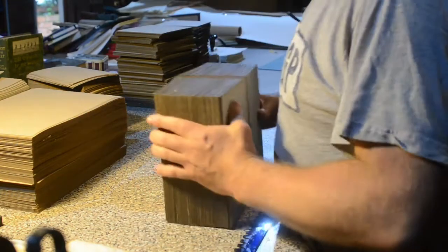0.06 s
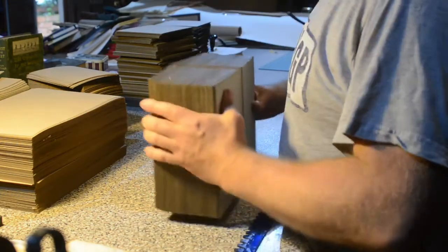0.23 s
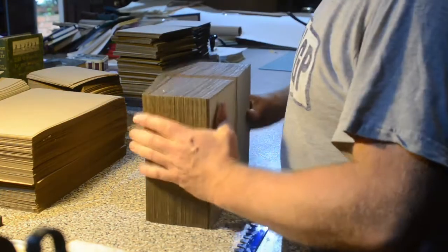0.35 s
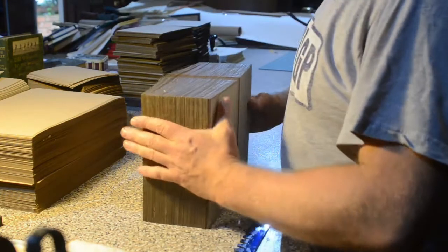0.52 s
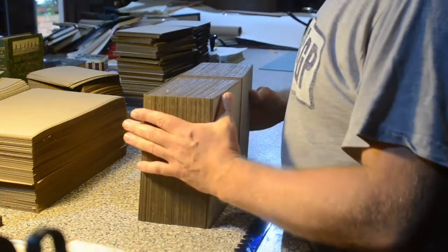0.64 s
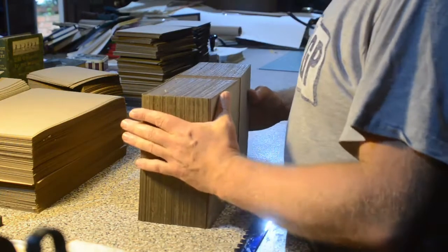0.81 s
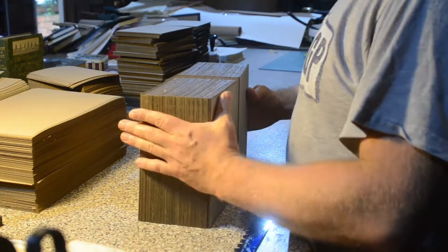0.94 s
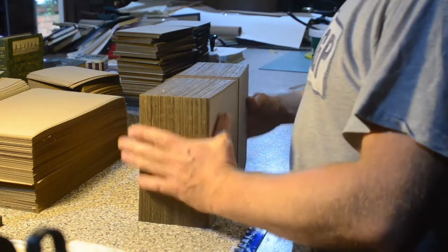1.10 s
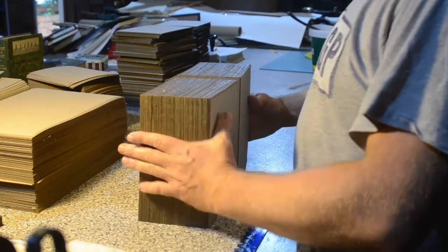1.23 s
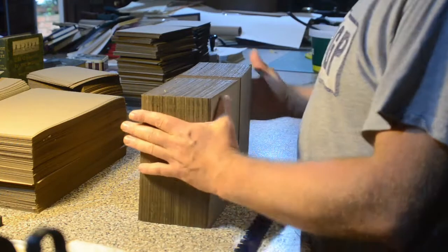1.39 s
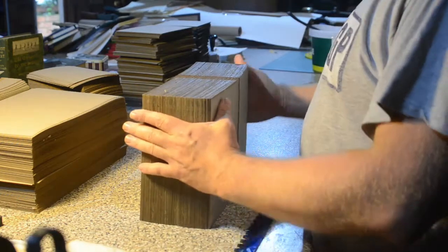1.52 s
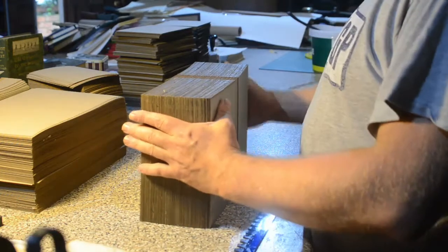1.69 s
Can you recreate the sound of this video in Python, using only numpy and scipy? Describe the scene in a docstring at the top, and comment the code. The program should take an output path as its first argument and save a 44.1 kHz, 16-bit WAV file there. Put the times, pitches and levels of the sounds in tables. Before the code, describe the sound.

A thick stack of boards is knocked down on a workbench at about 0.25 seconds, a loud clacking thud that overloads the microphone and rings for roughly half a second. Hands rub faintly and dryly over the stack, with a light tap near 0.9 seconds. Soft dull bumps and a couple of papery edge ticks follow from about 1.4 to 1.6 seconds, in an otherwise quiet workshop.

```python
"""A thick stack of boards is knocked down on a workbench, loud enough to overload the microphone.
The boards clack, air puffs out from under them, and bench and workshop ring on.
Hands then slide over the stack to square it: one light tap into its damped modes,
a few soft bumps, crisp edge ticks and dry friction between them, over a quiet room."""
import sys
import numpy as np
from scipy import signal
from scipy.io import wavfile
from scipy.ndimage import uniform_filter1d

SR = 44100
rng = np.random.default_rng(int(sys.argv[2]) if len(sys.argv) > 2 else 0)


def file_out(sig):
    """Save sig as 16-bit WAV at sys.argv[1]."""
    # one column per channel
    cols = np.atleast_2d(sig).T
    # limit, then scale
    lim = np.clip(cols, -1, 1)
    pcm = np.round(lim * 32767).astype(np.int16)
    wavfile.write(sys.argv[1], SR, pcm)


N = 77175
T = np.arange(N) / SR
CONTACT_RISE_S = 0.0006
# stack lands edge first, then flat, then settles; the last row is an echo of the slam: (time [s], level [dB],
# contact spread [s])
LANDINGS = [(.2447, 1, .0012), (0.2473, 3, .003), (0.2485, 3, 0.0067), (0.267, -14, .002),
            (0.3064, -6.5, .002)]


def slam():
    """Boards clack down milliseconds apart and push out a puff of air."""
    # clack spectrum: (frequency [Hz], density [dB])
    clack_spectrum = [(40, -20.5), (90, -12), (150, -4.5), (260, -6.5), (450, -1), (700, 3), (1000, 0.5),
                      (1500, 0), (2300, -3.5), (3300, -20), (4400, -11.5), (6000, -35.5), (8500, -27.5),
                      (12000, -47.5), (16000, -55)]
    clack_db, puff_db = -4.5, -24
    contact_power = sum((from_db(db) * swell(s, CONTACT_RISE_S, 2 * np.log(1000) * spread_s)) ** 2
                        for s, db, spread_s in LANDINGS)
    clack = np.sqrt(contact_power) * noise(clack_spectrum)
    puff = ring(clicks(LANDINGS[:2]), hz=28.72, t60_s=0.017)
    return from_db(clack_db) * clack + from_db(puff_db) * puff


def bench():
    """The edge landing sets bench and workshop ringing; the flat landing knocks the bench top."""
    # long resonances of bench and workshop: (frequency [Hz], level [dB])
    long_modes = [(88, -37.5), (160, -33), (381, -22.5), (621, -24), (670, -15), (783, -15), (888, -14),
                  (1042, -18), (1308, -19.5), (1482, -16), (1532, -14), (1660, -20), (1888, -20.5),
                  (1981, -20), (2324, -16), (2441, -23.5)]
    # short wooden knock: (frequency [Hz], level [dB], t60 [s])
    knock_modes = [(150, -20, .06), (495, -13, 0.066), (671.4, -2, 0.14), (770.6, -5, 0.075),
                   (1043.3, -5, 0.091)]
    knock_db, hum_db = -7, -2
    edge, flat = clicks(LANDINGS[:1]), clicks(LANDINGS[1:2])
    knock = sum(from_db(db) * ring(flat, hz, t60_s) for hz, db, t60_s in knock_modes)
    hum = sum((-1) ** k * from_db(db) * ring(edge, hz, t60_s=0.45)
              for k, (hz, db) in enumerate(long_modes))
    return from_db(knock_db) * knock + from_db(hum_db) * hum


def slam_tail():
    """The workshop returns the slam as a diffuse tail."""
    # tail spectrum: (frequency [Hz], density [dB])
    spectrum = [(30, -41), (60, -24), (90, -15), (200, -15.5), (300, -2), (500, -3.5), (750, 0), (1050, 2),
                (1500, 1), (2400, 0.5), (3400, -15), (4600, -22), (6200, -23.5), (8600, -24),
                (10300, -39.5), (12000, -55)]
    return from_db(-7) * reflections(spectrum, start_s=LANDINGS[0][0])


def tap():
    """A light tap rings the stack's damped modes; near surfaces echo it and the bench hums."""
    # tap on the stack: (time [s], level [dB])
    hits = [(0.924, -30)]
    # returns from near surfaces: (delay [s], gain [dB])
    echoes = [(.0036, -5.5), (.0085, -14), (.015, -18), (.020, -12)]
    # stack modes: (frequency [Hz], level [dB], t60 [s])
    modes = [(490, -0.5, 0.036), (700, -2, 0.083), (928, 6.5, 0.038), (1258, 9.5, 0.021),
             (1500, 5.5, 0.027), (1806, 1.5, 0.014), (2270, -9, 0.014)]
    low_hz, high_hz = 480, 2460
    direct = clicks(hits)
    returns = clicks([(s + delay_s, db + gain_db) for s, db in hits for delay_s, gain_db in echoes])
    force = butterworth(direct + returns, 8, high_hz)
    knock = sum(from_db(db) * ring(force, hz, t60_s) for hz, db, t60_s in modes)
    hum = from_db(-19) * ring(direct, hz=156.7, t60_s=0.15)
    return butterworth(knock, 4, low_hz, "high") + hum


def bumps():
    """Boards nudge each other under the hands: dull swells of low-passed noise."""
    # soft bumps: (time [s], level [dB], rise [s], t60 [s], low-pass corner [Hz])
    pushes = [(0, -58, .004, 0.25, 704), (.214, -50.5, 0.0057, .1, 1470), (1.36, -37, 0.012, 0.34, 801),
              (1.592, -31, 0.00033, 0.056, 1200), (1.602, -29, 0.004, 0.11, 1370),
              (1.618, -36, 0.0015, 0.34, 895)]
    # spectrum ahead of the low-pass: (frequency [Hz], density [dB])
    spectrum = [(30, -43), (55, -16), (85, -9), (170, 0.5), (260, -1), (370, -0.5), (550, -0.5), (850, 4.5),
                (1500, -3.5), (3000, -5.5), (8000, 0), (16000, -21)]
    shuffle = noise(spectrum)
    return sum(from_db(db) * swell(s, rise_s, t60_s) * butterworth(shuffle, 2, hz)
               for s, db, rise_s, t60_s, hz in pushes)


def ticks():
    """Single board edges catch with a papery tick."""
    # caught edges: (time [s], level [dB])
    catches = [(1.4454, -52), (1.5919, -41)]
    # tick spectrum: (frequency [Hz], density [dB])
    spectrum = [(100, -27), (1000, 7.5), (3000, 1), (6000, -12), (10000, -14), (16000, -26)]
    return noise(spectrum) * sum(from_db(db) * swell(s, CONTACT_RISE_S, t60_s=0.047) for s, db in catches)


def rubbing():
    """Hands and sleeves rub the boards; grainy friction follows the strokes."""
    # stroke envelope: (time [s], level [dB])
    strokes = [(0, -47.5), (.08, -50.5), (.18, -64), (.24, -55), (.5, -60), (.59, -52), (.75, -66.5),
               (.85, -57.5), (.92, -53.5), (1.01, -50), (1.085, -65.5), (1.13, -51), (1.23, -53),
               (1.315, -61), (1.36, -55.5), (1.455, -55), (1.575, -64.5), (1.66, -64.5), (1.70, -54.5),
               (1.75, -53.5)]
    # friction spectrum: (frequency [Hz], density [dB])
    spectrum = [(60, -16), (240, -9.5), (600, -9.5), (1400, -4), (2700, -2.5), (4500, -5.5), (6500, -10),
                (9300, -7.5), (12000, -27.5), (16000, -32)]
    grain_db, grains_per_s = 0.5, 60
    grain = uniform_filter1d(rng.standard_normal(N), int(SR / grains_per_s))
    roughness = from_db(grain_db * grain / grain.std())
    friction = from_db(np.interp(T, *np.transpose(strokes))) * noise(spectrum)
    return roughness * (friction + skims())


def skims():
    """Fingers skim the board edges, each slide swelling and fading in its own noise band."""
    # finger slides: (start [s], length [s], level [dB], centre [Hz], width [Hz])
    slides = [(0.069, 0.016, -49, 3030, 1210), (1.102, 0.089, -60, 2170, 1110),
              (1.208, 0.05, -50.5, 9700, 3600), (1.357, 0.013, -51, 3500, 1500),
              (1.429, 0.035, -52, 2550, 700)]
    out = np.zeros(N)
    for s, length_s, db, hz, width_hz in slides:
        rasp = butterworth(rng.standard_normal(N), 2, [hz - width_hz / 2, hz + width_hz / 2], "band")
        arch = np.sin(np.pi * np.clip((T - s) / length_s, 0, 1))
        out += from_db(db) * arch * rasp / rasp.std()
    return out


def workshop(x):
    """Room reverberation of a small sound, from a unit-energy impulse response."""
    # room colour: (frequency [Hz], level [dB])
    colour = [(30, -22), (90, 2), (300, 6), (650, 5), (1400, -1), (2500, 6), (5000, 7), (9000, 4.5),
              (16000, -17)]
    response = reflections(colour, start_s=0)
    return signal.fftconvolve(x, response / np.sqrt(np.sum(response ** 2)))[:N]


def reflections(colour, start_s):
    """Diffuse reflections build up quickly, then die band by band."""
    # room decay: (frequency [Hz], t60 [s])
    room_t60 = [(80, 0.45), (300, 0.55), (1000, 0.62), (2500, .58), (5000, 0.63), (10000, 0.29)]
    build_s = 0.027
    bands = [(hz, from_db(at_hz(colour, hz)) * band) for hz, band in noise_bands()]
    age_s = np.maximum(T - start_s, 0)
    tail = sum(band * decay(age_s, at_hz(room_t60, hz)) for hz, band in bands)
    build = 1 - np.exp(-(age_s / build_s) ** 2)
    return tail * build / sum(band for _, band in bands).std()


def room_tone():
    """Faint steady noise of the quiet room."""
    # background spectrum: (frequency [Hz], density [dB])
    spectrum = [(30, -13), (70, -6.5), (145, 4.5), (200, 2.5), (330, 2.5), (800, -1.5), (2500, -18.5),
                (8000, -20), (16000, -40.5)]
    return from_db(-62) * noise(spectrum)


def from_db(db):
    """Decibels to gain."""
    return 10 ** (np.asarray(db) / 20)


def at_hz(points, hz):
    """Table lookup on a log-frequency axis."""
    points_hz, values = np.transpose(points)
    return np.interp(np.log(hz), np.log(points_hz), values)


def butterworth(x, order, hz, kind="low"):
    """Causal Butterworth filter."""
    return signal.sosfilt(signal.butter(order, hz, kind, fs=SR, output="sos"), x)


def decay(age_s, t60_s):
    """Exponential decay from age 0."""
    return np.exp(-np.log(1000) * np.maximum(age_s, 0) / t60_s)


def swell(start_s, rise_s, t60_s):
    """Linear attack, exponential release."""
    return np.clip((T - start_s) / rise_s, 0, 1) * decay(T - start_s - rise_s, t60_s)


def noise_bands():
    """White noise in third octaves; yields (centre [Hz], band)."""
    edges_hz = 22 * 2 ** (np.arange(30) / 3)
    white = rng.standard_normal((2, N + SR // 4))
    for k, (low, high) in enumerate(zip(edges_hz, edges_hz[1:])):
        yield np.sqrt(low * high), butterworth(white[k % 2], 2, [low, high], "band")[-N:]


def noise(spectrum):
    """Noise of a given spectral shape, rms 1."""
    x = sum(from_db(at_hz(spectrum, hz)) * band for hz, band in noise_bands())
    return x / x.std()


def ring(force, hz, t60_s):
    """One damped mode; a unit click starts a sine of height 1."""
    r, w = np.exp(-np.log(1000) / (t60_s * SR)), 2 * np.pi * hz / SR
    return signal.lfilter([0, np.sin(w)], [1, -2 * r * np.cos(w), r * r], force + 1e-18)


def clicks(rows):
    """One impulse per (time [s], level [dB]) row."""
    force = np.zeros(N)
    for s, db, *_ in rows:
        force[int(s * SR)] += from_db(db)
    return force


def scene():
    """Landing, handling, reverberation and room tone, in mono."""
    tap_send_db, nudge_send_db = -11.5, -7
    knock = tap()
    nudges = bumps() + ticks()
    landing = slam() + bench() + slam_tail()
    reverb = workshop(from_db(tap_send_db) * knock + from_db(nudge_send_db) * nudges)
    return (landing + knock + nudges + reverb + rubbing() + room_tone())[None]


def record(dry):
    """Microphone: narrow dip, overload near full scale, treble cut."""
    notch_hz, stop_hz = 5667, 16700
    x = signal.lfilter(*signal.iirnotch(notch_hz, Q=11, fs=SR), dry)
    clipped = 0.98 * x / (1 + x ** 8) ** (1 / 8)
    return signal.sosfilt(signal.cheby2(16, 80, stop_hz, fs=SR, output="sos"), clipped)


dry = scene()
out = record(dry)
file_out(out)
```